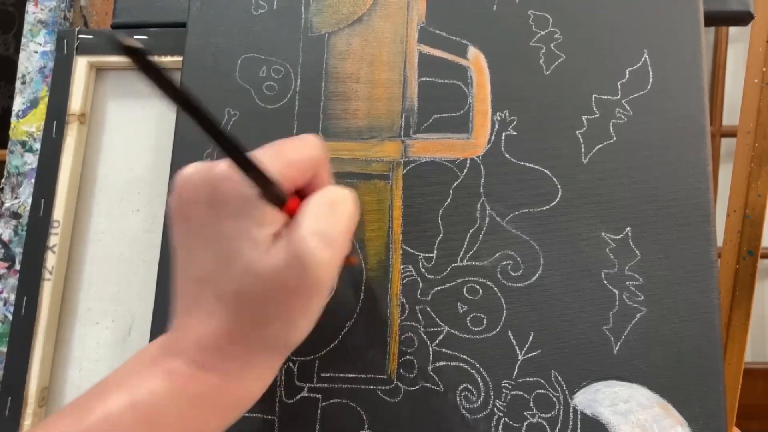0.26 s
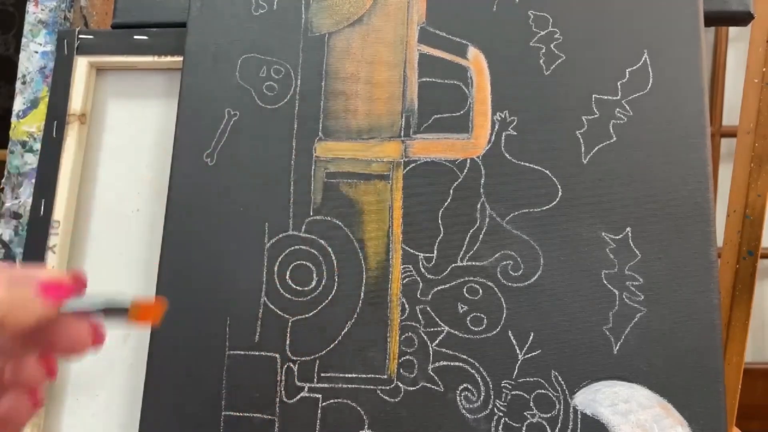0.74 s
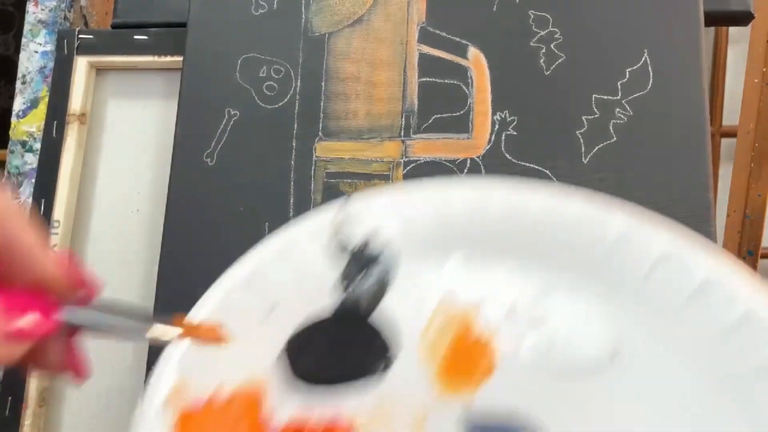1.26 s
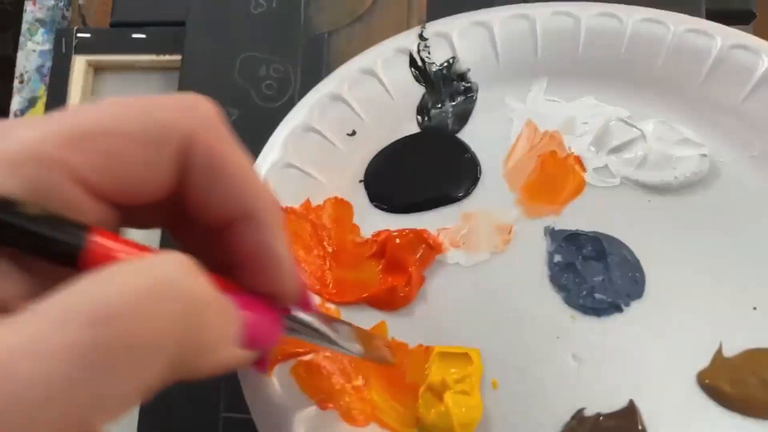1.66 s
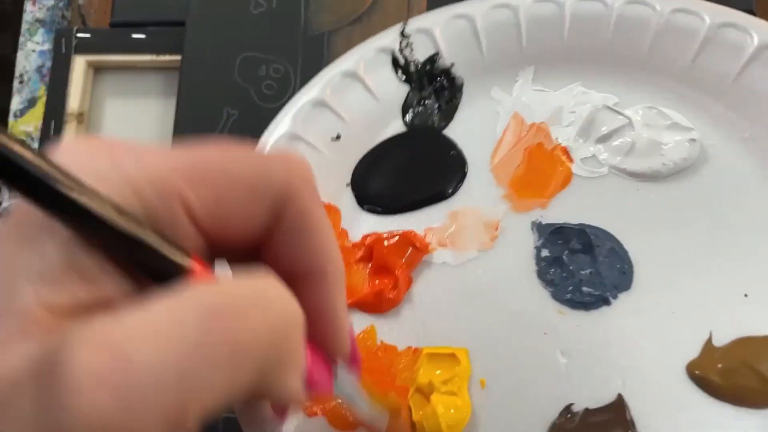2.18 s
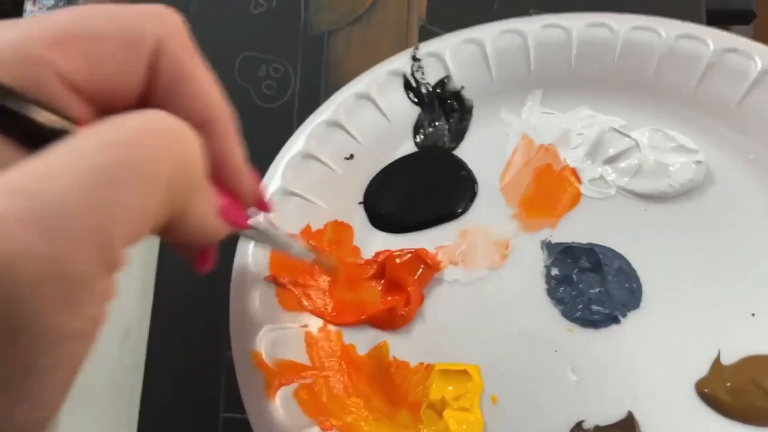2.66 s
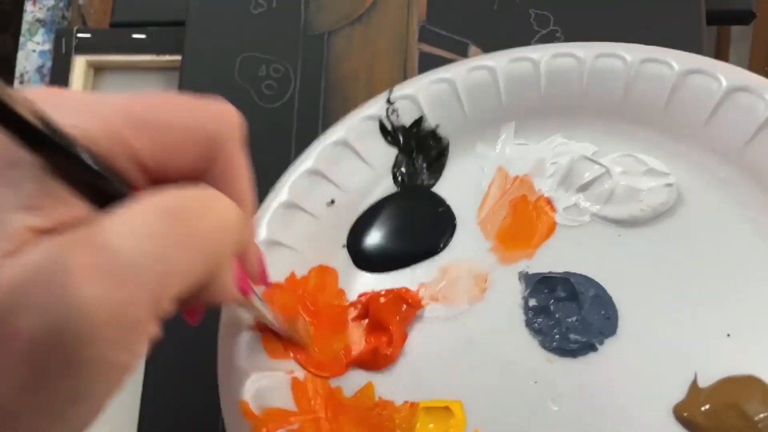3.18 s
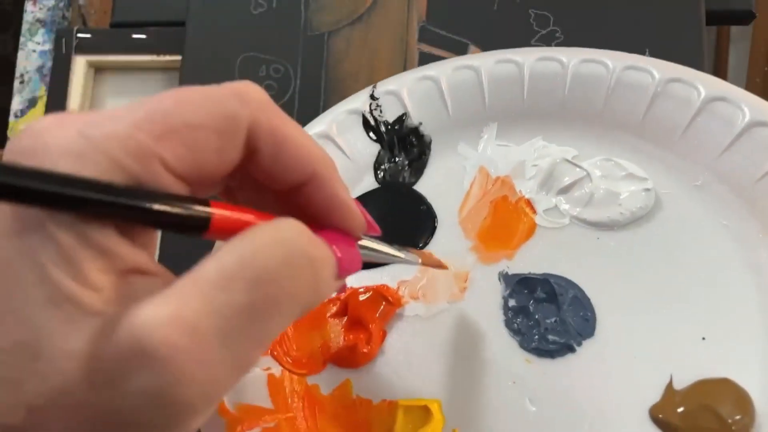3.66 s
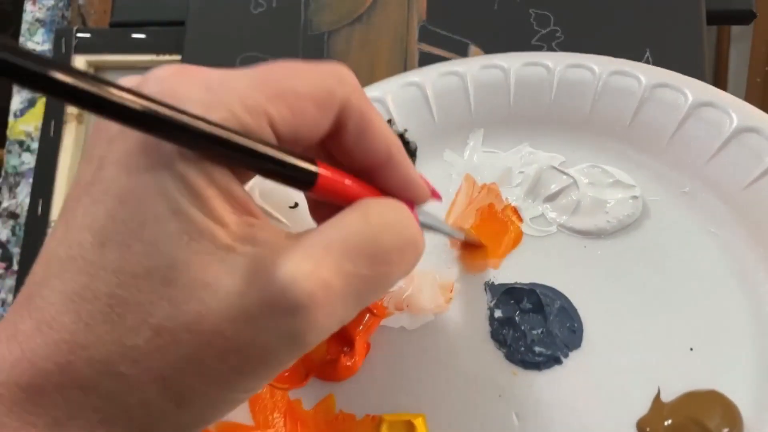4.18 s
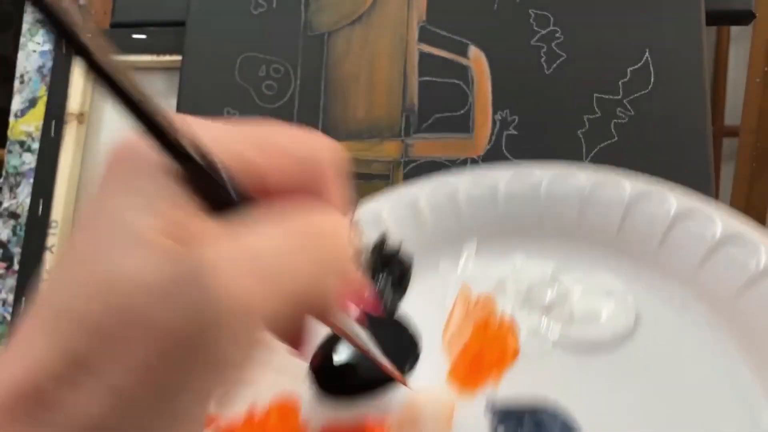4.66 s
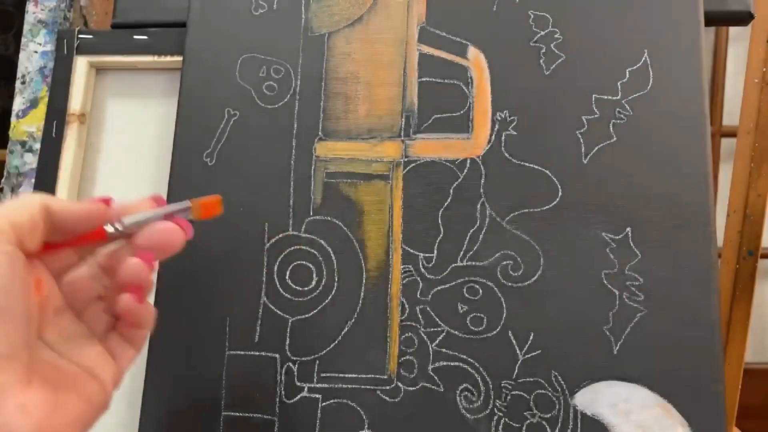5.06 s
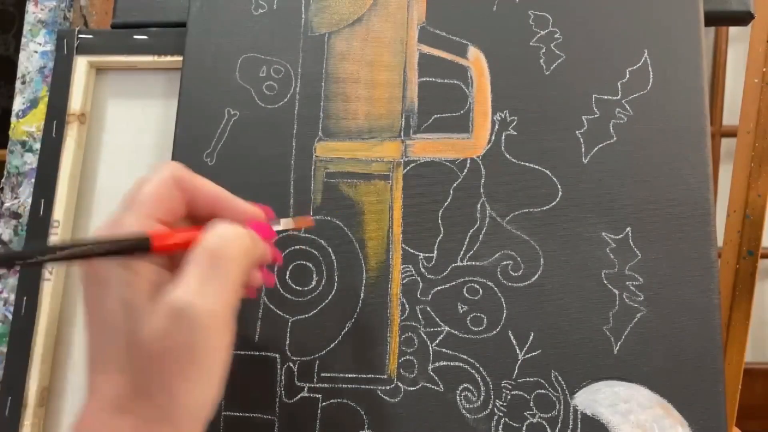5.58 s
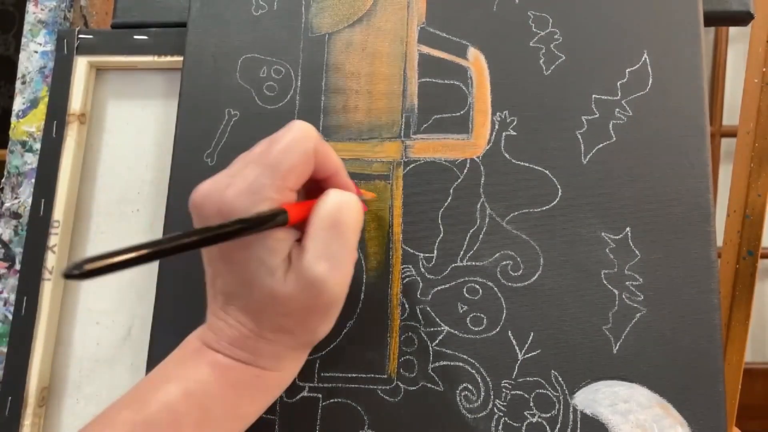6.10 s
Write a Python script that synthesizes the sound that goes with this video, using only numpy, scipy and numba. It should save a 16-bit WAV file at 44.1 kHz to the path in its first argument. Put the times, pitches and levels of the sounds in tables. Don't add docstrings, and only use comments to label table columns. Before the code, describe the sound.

In a small quiet room with low hum and faint air, a brush lightly rubs canvas, then handle and nails tick on a thin plastic plate and a hard, bouncing knock cracks out. Soft, irregular dabs into paint follow with hollow taps, then a busier burst of rattles, bristle hiss and a second, softer knock as the plate is put down. Faint strokes end it. Close phone microphone.

```python
import sys
import numpy as np
from scipy import signal
from scipy.fft import rfft, irfft
from scipy.io import wavfile
from scipy.ndimage import uniform_filter1d
from numba import njit

SR = 44100
rng = np.random.default_rng(int(sys.argv[2]) if len(sys.argv) > 2 else 0)


def file_out(sig):
    cols = np.atleast_2d(sig).T
    lim = np.clip(cols, -1, 1)
    pcm = np.round(lim * 32767).astype(np.int16)
    wavfile.write(sys.argv[1], SR, pcm)


def decibels_to_gain(level_db):
    exponent = np.asarray(level_db, float) / 20
    return 10 ** exponent


N = 279594


def unit(x):
    return x / np.sqrt(np.mean(x ** 2))


def steady(x):
    return x / np.sqrt(uniform_filter1d(x ** 2, 4000))


@njit
def ring(x, hz, t60):
    y, z, p = np.empty(len(x)), 0j, 0j
    for i in range(len(x)):
        if i % 64 == 0:
            p = np.exp(2j * np.pi * hz[i % len(hz)] / SR - np.log(1000) / (t60 * SR))
        z = z * p + x[i]
        y[i] = z.imag
    return y


def mode(x, hz, t60):
    return ring(x, np.array([float(hz)]), float(t60))


def colour(x, table):
    hz = np.fft.rfftfreq(len(x), 1 / SR)
    f, db = np.transpose(table)
    shade_db = np.interp(np.log(np.maximum(hz, 1)), np.log(f), db, left=-90, right=-90)
    return unit(irfft(rfft(x) * decibels_to_gain(shade_db), len(x)))


def walk(rate):
    hold = int(SR / rate)
    steps = np.repeat(rng.standard_normal(N // hold + 1), hold)
    return 1.3 * uniform_filter1d(uniform_filter1d(steps, hold), hold)[:N]


def slips(scatter_db):
    force = np.minimum(rng.exponential(size=N), 4)
    return unit(rng.standard_normal(N) * decibels_to_gain(scatter_db * force))


def sheet(drive, t60, rate):
    t = np.arange(2048) / SR
    answers = rng.standard_normal((8, len(t))) * decibels_to_gain(-60 * t / t60)
    spectra = rfft(answers, 4096)
    answers = irfft(spectra / np.sqrt(np.mean(np.abs(spectra) ** 2, axis=0)), 4096)
    mixed = sum(unit(signal.oaconvolve(drive, a)[:N]) * np.sinh(0.76 * walk(rate)) for a in answers)
    return mixed / np.sqrt(uniform_filter1d(mixed ** 2, 2000) / uniform_filter1d(drive ** 2, 2000))


SPAN_DB = 30
LIFT_SHARE = 0.36


def touches(peaks, held, rise, fall, rest_db, above=0, quick=1):
    rows = [(r[0], r[1], 0, r[2], r[3], r[3], r[-1]) for r in peaks]
    rows += [(s, rise, length, fall, first, last, up) for s, length, first, last, up in held]
    ms = np.arange(0, N / SR, .001)
    db = np.full(len(ms), float(rest_db))
    knee = 2 / 3
    lift = knee + LIFT_SHARE
    loss = SPAN_DB * np.array([knee + 1, knee, 0, 0, knee, knee + 1])
    for s, up_s, length, down_s, first, last, up in rows:
        down_s = down_s * quick
        when = s + np.array([-up_s * lift, -up_s * knee, 0,
                             length + 1e-6, length + down_s * knee, length + down_s * lift])
        level = np.array([first, first, first, last, last, last]) - loss + above * up
        db = np.maximum(db, np.interp(ms, when, level))
    return np.interp(np.arange(N) / SR, ms, db)


# (f/Hz, level/dB per Hz)
HUM_COLOUR = [(30, -31), (62, -3.5), (190, -4), (282, 2), (452, -14), (639, -8), (963, -18.5), (1690, -35)]


def room_hum():
    return colour(rng.standard_normal(N), HUM_COLOUR) * decibels_to_gain(-67 + 0.5 * walk(5.11))


# (f/Hz, level/dB per Hz)
AIR_COLOUR = [(760, -37.5), (1300, -2), (2530, -10), (5900, -11.5), (8500, -13), (13900, -10.5),
              (15700, -6.5)]


def still_air():
    air = rng.standard_normal(N)
    return colour(air + .5 * sheet(air, t60=0.017, rate=14), AIR_COLOUR) * decibels_to_gain(-71)


def room(x):
    t60_s, level_db = 0.35, -21
    t = np.arange(int(.5 * SR)) / SR
    dull = signal.lfilter([1], [1, -.6], rng.standard_normal(len(t)))
    tail = dull * decibels_to_gain(-60 * t / t60_s) * (t > .004)
    return decibels_to_gain(level_db) * signal.fftconvolve(x, tail / np.sqrt(np.sum(tail ** 2)))[:N]


# (t/s, level/dB, f/Hz, rise/s)
THUD_EVENTS = [
    (.2, -59.5, 95, 0.062),
    (0.891, -43.5, 71, 0.021),
    (1.24, -65, 95.2, 0.038),
    (3.0, -55.5, 97.8, 0.013),
    (5.36, -47.5, 91, 0.011),
    (5.53, -70, 101.5, 0.016),
    (5.52, -43, 158, 0.018),
]


def thuds():
    t = np.arange(N) / SR
    noise = rng.standard_normal(N)
    out = np.zeros(N)
    for s, db, hz, rise in THUD_EVENTS:
        age = np.maximum(t - s, 0) / rise
        frame = unit(mode(mode(noise, hz, .04), hz, .04))
        out += decibels_to_gain(db) * age * np.exp(1 - age) * frame
    return out


# (t/s, ring level/dB, ring f/Hz, crack level/dB)
PLATE_TICKS = [(1.824, -42, 1500, -55.5), (0.612, -54.5, 870, -59), (0.707, -33.5, 882, -48),
               (.749, -37, 870, -40.5), (.824, -31.5, 2160, -47.5), (0.8625, -50, 910, -22),
               (1.0296, -46, 950, -38), (1.33, -39, 1910, -75), (1.345, -48, 3400, -71),
               (1.835, -36.5, 956, -58.5), (1.906, -34.5, 1186, -47.5), (2.057, -46.5, 4460, -68),
               (2.2, -25.5, 1200, -45), (2.203, -36.5, 2770, -65), (2.473, -54, 1220, -75),
               (2.826, -44.5, 1283, -45), (2.888, -50.5, 865, -63), (2.987, -35, 2056, -62),
               (3.12, -46, 1106, -51.5), (3.175, -45, 980, -64.5), (3.991, -53, 1140, -44),
               (4.093, -45.5, 1610, -44.5), (4.335, -54, 1090, -47), (4.4837, -49, 1430, -47),
               (4.57, -28.5, 1556, -26.5), (4.583, -28, 2290, -28), (5.1273, -53, 2100, -50),
               (5.1419, -49, 2100, -42.5), (5.1498, -41, 2090, -34), (5.1542, -38, 2110, -28.5),
               (5.1863, -38, 1150, -43), (5.311, -30, 1190, -41), (5.3218, -25, 2430, -33),
               (5.387, -39, 880, -28.5), (5.456, -40, 900, -30), (5.483, -28.5, 1137, -60.5),
               (5.515, -21.5, 901, -48.5), (5.809, -57, 1790, -54)]
# (t/s, level/dB, f/Hz)
HOLLOW_THUMPS = [(0.613, -48, 378), (0.708, -54, 428), (0.861, -42, 387), (1.835, -29.5, 439),
                 (2.475, -55, 425), (2.888, -49, 236), (2.986, -33, 225), (3.118, -50, 261.4),
                 (4.096, -35.5, 417), (4.335, -35, 415), (5.312, -36, 390), (5.387, -47, 474),
                 (5.484, -39, 603), (5.515, -21.5, 423), (5.526, -32, 426)]


def taps():
    n = 8192
    out = np.zeros(N + n)
    t = np.arange(n) / SR
    bright = signal.butter(2, 3300, "high", fs=SR, output="sos")
    snap = np.tanh(t / .0005) * (np.exp(-t / .0022) + .12 * np.exp(-t / .015))
    for s, db, hz, crack_db in PLATE_TICKS:
        push, spit = rng.standard_normal((2, n))
        push = push * np.exp(-t / 0.0075) + 6.5 * (t == 0)
        spread = np.r_[0., rng.standard_normal(6)]
        plate = sum(mode(push, hz * 1.15 ** k, 60 / hz) for k in spread)
        crack = signal.sosfilt(bright, spit) * snap
        out[int(s * SR):][:n] += decibels_to_gain(db) * plate / np.abs(plate).max() + decibels_to_gain(crack_db) * crack
    for s, db, hz in HOLLOW_THUMPS:
        push = rng.standard_normal(n) * np.exp(-t / 0.011)
        spread = np.r_[0., rng.standard_normal(2)]
        hollow = sum(mode(push, hz * 1.2 ** k, 0.085) for k in spread)
        out[int(s * SR):][:n] += decibels_to_gain(db) * hollow / np.abs(hollow).max()
    return out[:N]


def knock(blows, modes, push_s, gain_db, crack_db):
    out = np.zeros(N)
    chance = rng.standard_normal((len(blows), len(modes)))
    first = int(blows[0][0] * SR) - 64
    t = (np.arange(N) / SR)[first:first + 16384]
    spit = signal.lfilter([1, -1], 1, rng.standard_normal(len(t)))
    for (s, db, snap_db), luck in zip(blows, chance):
        age = np.maximum(t - s, 0)
        push = age / push_s * np.exp(-age / push_s)
        push /= push.sum()
        rung = sum(decibels_to_gain(g + 3.5 * k) * mode(push, hz, t60) for (hz, g, t60), k in zip(modes, luck))
        crack = spit * (age > 0) * np.exp(-age / 0.0038)
        out[first:first + len(t)] += decibels_to_gain(db + gain_db) * rung + decibels_to_gain(crack_db + snap_db) * crack
    return out


# (t/s, peak level/dB, crack level/dB)
HARD_KNOCK = [(.8855, -17.5, -21), (0.8873, 0, -13.5), (0.8908, -4, -13), (.8925, 2.5, -14),
              (0.8945, 2.5, -5), (.8956, 3.5, -4.5), (.8966, 0.5, -12), (0.9, -7.5, -14), (0.9048, -1, -15),
              (0.911, -7, -18), (.9175, -12.5, -21)]
# (f/Hz, level/dB, t60/s)
HARD_KNOCK_MODES = [(183, -20, 0.19), (218, -15.5, 0.061), (367, -14, 0.12), (452, -4.5, 0.16),
                    (615, -13, 0.05), (810, -6, 0.07), (935, 5, 0.018), (1200, -5, 0.03),
                    (1433, -12, 0.048), (1610, -6, 0.025), (2150, -11, 0.0364), (2900, -18.5, 0.017),
                    (6027, -6.5, .012), (5000, -4.5, 0.018)]
# (t/s, peak level/dB, crack level/dB)
PLATE_DOWN = [
    (5.357, -12.5, -20),
    (5.3597, -2, -6),
    (5.3618, -2, -8.5),
    (5.364, -3, -12),
    (5.374, -15, -21),
]
# (f/Hz, level/dB, t60/s)
PLATE_DOWN_MODES = [(198.3, -25, 0.12), (356.5, -21, 0.11), (475, 13.5, 0.0053), (586, -7, 0.05),
                    (854, 4.5, 0.028), (937, 1, 0.022), (1283, -8, 0.038), (1790, -3, 0.04),
                    (3000, -2, 0.038), (7500, 9.5, 0.027), (10200, -6, .015)]


def knocks():
    hard = knock(HARD_KNOCK, HARD_KNOCK_MODES, push_s=.00005, gain_db=-14.5, crack_db=-21.5)
    return hard + knock(PLATE_DOWN, PLATE_DOWN_MODES, push_s=.00006, gain_db=-21.0, crack_db=-38.0)


# (t/s of peak, rise/s, fall/s, level/dB, f/Hz)
MODE_SWELLS = [(.05, 0.21, 0.23, -73, 680), (0.649, 0.045, 0.11, -59, 1830),
               (0.865, .006, 0.018, -35, 6340), (0.898, .01, .03, -37.5, 9700),
               (1.149, 0.11, 0.22, -65, 1900), (1.334, .015, 0.11, -65, 4700),
               (1.73, 0.034, 0.04, -69.5, 8970), (1.759, .006, 0.02, -68, 12600),
               (2.075, 0.02, .05, -61.5, 4480), (2.25, 0.058, 0.11, -52, 508),
               (2.828, 0.005, 0.06, -51.5, 3160), (2.828, .005, 0.037, -52.5, 4580),
               (2.835, 0.013, .08, -62, 7040), (2.841, .02, 0.065, -62.5, 1400),
               (2.895, 0.035, 0.037, -60, 2920), (2.97, 0.066, 0.053, -59, 7160),
               (3.029, 0.055, 0.07, -53, 1900), (3.24, .05, 0.045, -63.5, 7260),
               (3.24, .06, .05, -61.5, 4240), (4.035, 0.039, 0.042, -44.5, 607),
               (4.101, 0.028, 0.052, -48.5, 1610), (4.25, 0.1, .04, -46.5, 1264),
               (4.49, .04, 0.075, -45.5, 1500), (4.865, .02, 0.075, -50, 810),
               (4.94, .1, 0.041, -56.5, 2920), (5.047, 0.027, 0.042, -47, 1200),
               (5.05, 0.044, 0.039, -54, 2940), (5.135, .05, 0.033, -48, 1585),
               (5.155, .01, 0.032, -35.5, 13000), (5.2, 0.035, 0.069, -48, 3280),
               (5.221, .03, 0.06, -39, 8500), (5.245, 0.051, 0.045, -37, 7500),
               (5.39, 0.0095, 0.018, -34.5, 13520), (5.39, .01, 0.042, -35, 9770),
               (5.46, .01, 0.033, -41, 10580), (5.49, .02, 0.035, -43, 7230),
               (5.53, .06, 0.055, -57, 3660),
               (.16, .12, .06, -62, 14600), (.42, .012, 0.045, -59, 10000), (.8, .02, .04, -43, 1010),
                (1.181, 0.036, .04, -56, 903), (1.26, 0.054, .14, -64, 1920),
                (1.838, .02, .05, -59.5, 5300), (1.875, 0.042, .05, -58, 2900),
                (1.885, .04, .04, -60, 1520), (2.041, .006, .015, -61, 1720),
                (2.06, .006, .03, -63.5, 6300), (2.085, 0.033, 0.057, -61.5, 980),
                (2.28, 0.053, 0.064, -61, 3100), (2.29, 0.068, .12, -61, 1890),
                (2.987, 0.003, .03, -48, 2090), (3.355, 0.044, 0.034, -67.5, 2750),
                (3.365, .05, 0.037, -64, 1279), (.884, .02, .01, -38, 1708), (3.43, 0.037, .05, -70, 1800),
                (4.37, 0.028, 0.11, -52, 6460), (4.47, .03, .05, -65, 10400),
                (4.51, 0.086, 0.11, -49, 6230), (5.458, .004, .02, -46, 5000),
                (5.487, 0.0053, .04, -41.5, 1870), (5.83, .04, 0.053, -57.5, 9240),
                (6.065, .03, .03, -61, 7500), (3.08, .08, .05, -64, 1900), (3.065, .1, 0.074, -57, 235),
                (5.63, .15, 0.16, -55.5, 270), (.82, .05, .06, -55, 110.5), (2.89, .01, .06, -59, 3050),
                (5.153, .006, .015, -38, 14600), (.66, .06, .1, -70, 3000), (1.828, .006, .03, -46, 430),
                (.91, .008, .02, -22, 540), (5.37, .02, .1, -36, 290), (1.345, .03, .1, -60, 4000),
                (4.23, .1, .06, -54, 620), (1.03, .005, .02, -46, 14000)]


def swells():
    n = 16384
    out = np.zeros(N + n)
    t = (np.arange(n) - n // 2) / SR
    for s, rise, fall, db, hz in MODE_SWELLS:
        t60 = 17 / hz
        tone = unit(mode(mode(rng.standard_normal(n), hz, t60), hz, t60))
        tone *= decibels_to_gain(db - SPAN_DB * np.where(t < 0, -t / rise, t / fall))
        start = int(s * SR) - n // 2
        out[max(start, 0):start + n] += tone[max(-start, 0):]
    return out[:N]


# (t/s of peak, rise/s, fall/s, high ring level/dB, low ring level/dB above it)
RUB_EVENTS = [(.002, .01, 0.096, -70, 2), (.613, 0.004, 0.43, -59.5, 4), (.925, .03, 0.21, -38.5, 6),
              (1.179, 0.026, 0.052, -56, 8.5), (1.341, 0.056, 0.12, -47, -5), (2.2, 0.015, 0.21, -45.5, 2),
              (2.62, 0.17, 0.065, -56.5, -1), (2.825, 0.0078, 0.078, -57, -9),
              (2.885, 0.018, 0.26, -57, 1.5), (2.99, 0.068, 0.14, -50.5, -18),
              (3.115, 0.0084, 0.086, -56.5, -12), (3.17, 0.026, 0.17, -53, 3),
              (3.36, 0.077, 0.07, -66, -2.5), (3.425, 0.066, 0.088, -60, -1),
              (4.002, 0.027, 0.11, -46, 2.5), (4.335, 0.0034, 0.494, -50, 4), (4.521, 0.1, 0.18, -42.5, 0),
              (4.6, 0.17, 0.14, -44, 3.5), (5.192, 0.069, 0.28, -33, 2), (5.33, 0.088, 0.21, -38, 4),
              (5.385, 0.036, 0.19, -42, -1), (5.51, 0.24, 0.14, -47.5, 11.5),
              (5.824, 0.025, 0.092, -53.5, -24)]
# (t/s of start, length/s, first level/dB, last level/dB, low ring level/dB above it)
HELD_RUBS = [
    (0.193, 0.14, -58.5, -59.5, 4),
    (0.709, 0.22, -53.5, -37.5, 2.5),
    (1.073, 0.52, -61.5, -80, 1),
    (1.828, 0.088, -64.5, -54.5, 0),
    (4.082, 0.17, -61, -52.5, 2.5),
    (4.888, 0.068, -51, -49, 4),
    (5.035, 0.17, -55, -63, -1.5),
    (5.929, 0.12, -62.5, -53, -25),
]
# (t/s of peak, rise/s, fall/s, level/dB)
DRUM_PRESSES = [(.05, 0.22, 0.22, -67.5), (.2, 0.074, 0.28, -56.5), (.64, 0.04, 0.5, -58),
                (.708, 0.011, 0.074, -40), (.875, 0.4, 0.041, -44.5), (.925, 0.038, 0.22, -32.5),
                (1.179, 0.034, 0.29, -56), (1.341, 0.08, 0.14, -53.5), (1.835, 0.049, 0.29, -51.5),
                (1.925, 0.19, 0.16, -49.5), (2.2, 0.016, 0.18, -41.5), (2.7, 0.24, 0.18, -65.5),
                (2.885, 0.02, 0.65, -61), (.83, 0.054, .1, -43.5), (2.995, 0.018, 0.29, -61),
                (3.115, .02, 0.42, -64), (4.002, 0.03, 0.61, -58.5), (4.088, 0.17, 0.88, -56.5),
                (4.335, 0.0075, 0.45, -48), (4.521, 0.09, 0.23, -47.5), (4.6, 0.13, 0.16, -48.5),
                (4.886, 0.061, 0.29, -51), (4.958, 0.15, 0.14, -48.5), (5.032, 0.028, 0.87, -57),
                (5.192, .06, 0.97, -48.5), (5.35, 0.11, 0.22, -40), (5.385, .1, 0.1, -32.5),
                (5.47, 0.41, 0.17, -43.5), (5.515, 0.071, 0.16, -35.5)]
# (t/s, f/Hz)
HIGH_SPOT = [(0, 1800), (1.8, 1764), (1.93, 2150), (2.2, 1760), (2.62, 2317), (2.9, 2090), (2.99, 2200),
             (3.06, 1900), (4.001, 2000), (4.1, 1650), (4.25, 1920), (4.5, 1660), (4.6, 2110), (5.35, 2285),
             (5.421, 1744), (5.85, 1708), (5.95, 1992), (6.1, 1766)]


def rubs():
    both = RUB_EVENTS, HELD_RUBS, 0.035, 0.11
    low_db = touches(*both, rest_db=-84, above=0.7)
    high_db = touches(*both, rest_db=-81.5)
    drum_db = touches(DRUM_PRESSES, [], 0, 0, rest_db=-76.5)
    return low_db, high_db, drum_db, np.interp(np.arange(N) / SR, *np.transpose(HIGH_SPOT))


# (f/Hz, level/dB per Hz)
LOW_RING_COLOUR = [(410, -46.5), (640, -20), (850, -3), (1190, -5.5), (1450, -9), (1880, -31), (3190, -120)]
HIGH_RING_COLOUR = [(900, -47), (1400, -10), (1600, 1), (3100, 1), (4000, -20), (5800, -38)]
DRUM_COLOUR = [(71, -43.5), (120, -14.5), (221, -9.5), (319, -4), (411, -3), (693, -6), (800, -16),
               (1040, -34.5)]
# (t/s, f/Hz)
LOW_RING_SPOT = [(0, 950), (2.2, 1200), (3.2, 1026), (4.6, 1113), (4.84, 820), (5.02, 854), (5.16, 1260),
                 (5.5, 930)]


def body(drive):
    low_db, high_db, drum_db, spot_hz = rubs()
    thin = sheet(drive, t60=0.11, rate=10)
    spot = steady(ring(ring(slips(scatter_db=1.5), spot_hz, .006), spot_hz, .006))
    wide = np.clip(decibels_to_gain(bristles()[0] - high_db + 4), .38, 1.2)
    high = (wide * colour(thin, HIGH_RING_COLOUR) + spot) / np.sqrt(1 + wide ** 2)
    low_hz = np.interp(np.arange(N) / SR, *np.transpose(LOW_RING_SPOT))
    lean = steady(ring(ring(drive, low_hz, .012), low_hz, .012))
    low = colour(thin, LOW_RING_COLOUR) + decibels_to_gain(-4) * lean
    drum = colour(sheet(drive, t60=0.028, rate=7.6), DRUM_COLOUR)
    return decibels_to_gain(low_db - 1.5) * low + decibels_to_gain(high_db) * high + decibels_to_gain(drum_db) * drum


# (t/s of peak, rise/s, fall/s, hiss level/dB, tip fizz level/dB above it)
BRISTLE_STROKES = [(0.002, .01, 0.053, -71.5, 15), (.416, .012, 0.18, -72.5, 35),
                   (.54, 0.42, 0.11, -72, 32.5), (.69, 0.33, 0.075, -67.5, 18.5),
                   (.864, 0.008, 0.04, -33, 0), (.885, 0.037, 0.054, -36, -1.5),
                   (.925, 0.15, 0.11, -35, -12), (1.345, 0.054, 0.14, -69, -20),
                   (1.759, .012, .04, -72.5, 22), (4.956, 0.12, 0.091, -54, -5),
                   (5.066, 0.13, 0.017, -60.5, 1), (5.148, 0.042, 0.31, -46, 13),
                   (5.21, 0.13, 0.19, -34.5, -11.5), (5.246, 0.21, 0.19, -39.5, -4),
                   (5.29, .1, .1, -48.5, 9), (5.372, .05, .1, -41.5, 0), (5.43, .1, .1, -50.5, 7),
                   (5.49, 0.027, 0.11, -45.5, 3.5), (5.335, 0.24, 0.4, -40.5, -6.5),
                   (5.385, .05, 0.16, -41, 2), (5.457, 0.02, 0.19, -43.5, 4), (5.82, 0.039, 0.095, -57, 18),
                   (5.6, .2, 0.12, -73.5, 20), (5.9, 0.11, 0.33, -75, 16), (6.066, 0.25, 0.19, -59, 10.5),
                   (1.919, 0.13, 0.07, -53.5, -8.5), (2.07, 0.059, 0.062, -65.5, -7),
              (2.211, 0.024, 0.12, -48, 3), (2.61, 0.13, 0.083, -54.5, 8), (2.827, 0.013, 0.092, -51, 7.5),
              (2.98, 0.16, 0.086, -56, 3), (3.121, 0.016, 0.071, -55, 1), (3.252, 0.21, 0.061, -61, 5),
              (3.362, 0.074, .045, -64, -2.5), (3.428, 0.061, 0.064, -58, -5),
              (4.002, 0.032, 0.098, -47.5, -4), (4.371, 0.064, 0.23, -48.5, -5.5),
              (4.514, 0.12, 0.28, -43, -2), (4.599, 0.37, 0.12, -45.5, 1), (4.667, 0.27, 0.06, -57.5, 4)]
# (t/s of start, length/s, first level/dB, last level/dB, tip fizz level/dB above it)
HELD_DRAGS = [
    (0.189, 0.13, -65.5, -51, 11.5),
    (0.286, 0.074, -57, -56, 16),
    (0.718, 0.135, -48.5, -44.5, 3),
    (0.967, 0.086, -44.5, -55.5, 0.5),
    (4.09, .17, -58.5, -51.5, -4),
]


def bristles():
    both = BRISTLE_STROKES, HELD_DRAGS, .03, 0.072
    return touches(*both, rest_db=-85), touches(*both, rest_db=-85, above=0.62, quick=.85)


# (f/Hz, level/dB per Hz)
HISS_COLOUR = [(1820, -25), (3100, -5), (4370, -1), (6600, -1), (8700, -7), (10500, -6), (14000, -34)]
FIZZ_COLOUR = [(5880, -38), (10000, -15), (12000, -5), (13200, 1.5), (14300, 3), (15700, 4.5)]


def brush(drive):
    hiss_db, fizz_db = bristles()
    fine = sheet(drive, t60=0.016, rate=28) + .9 * drive
    hiss = decibels_to_gain(hiss_db + 0.53 * walk(27)) * colour(fine, HISS_COLOUR)
    return hiss + decibels_to_gain(fizz_db + 0.37 * walk(34)) * colour(fine, FIZZ_COLOUR)


def scene():
    no_bass = signal.butter(4, 170, "high", fs=SR, output="sos")
    hits = signal.sosfilt(no_bass, taps() + knocks())
    background = room_hum() + still_air() + room(hits)
    drive = slips(scatter_db=2.6) * decibels_to_gain(1.1 * walk(150))
    mix = background + thuds() + hits + swells() + body(drive) + brush(drive)
    return mix[None]


def low_pass(x):
    return signal.sosfilt(signal.butter(12, 15870, fs=SR, output="sos"), x)


def record(dry):
    dry = signal.sosfilt(signal.butter(3, 45, "high", fs=SR, output="sos"), dry)
    treble_stop = signal.ellip(10, .2, 70, 15900, fs=SR, output="sos")
    dry = signal.sosfilt(treble_stop, np.clip(dry, -1, 1))
    return low_pass(dry)


dry = scene()
out = record(dry)
file_out(out)
```